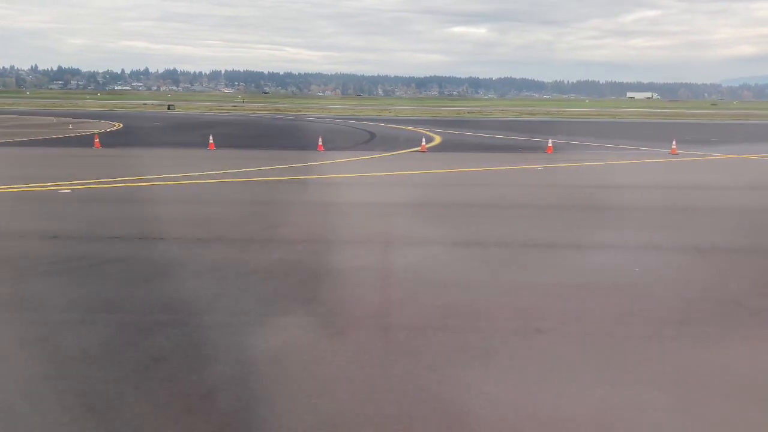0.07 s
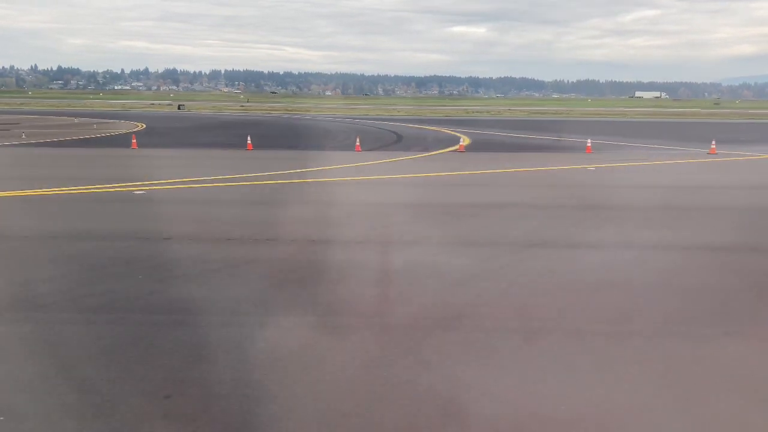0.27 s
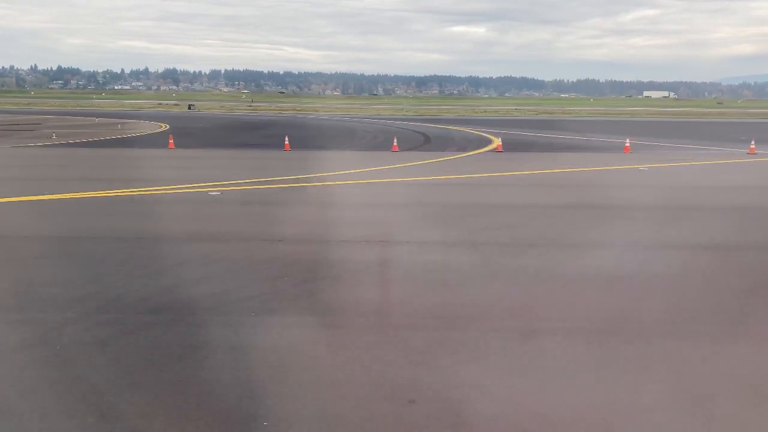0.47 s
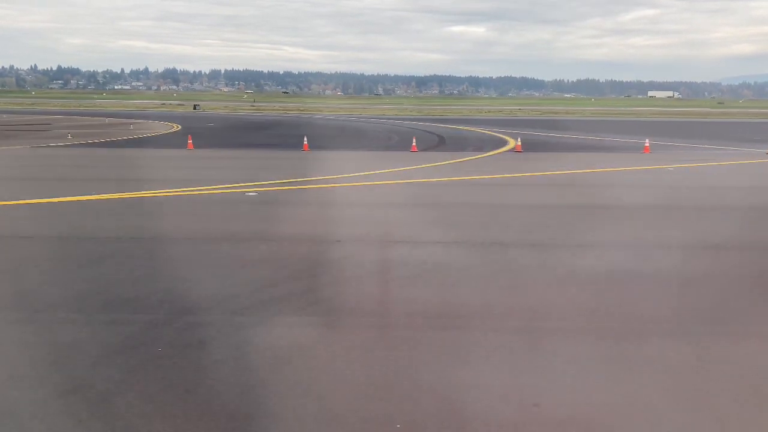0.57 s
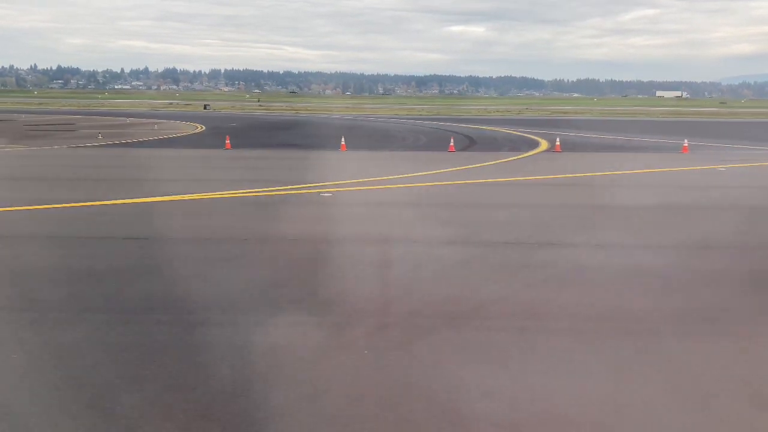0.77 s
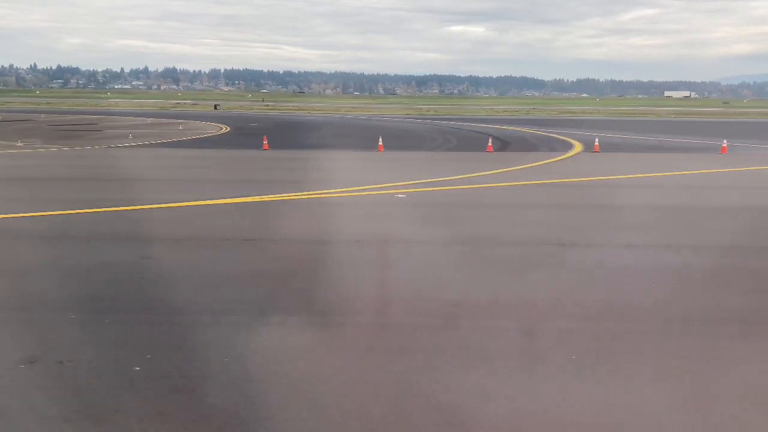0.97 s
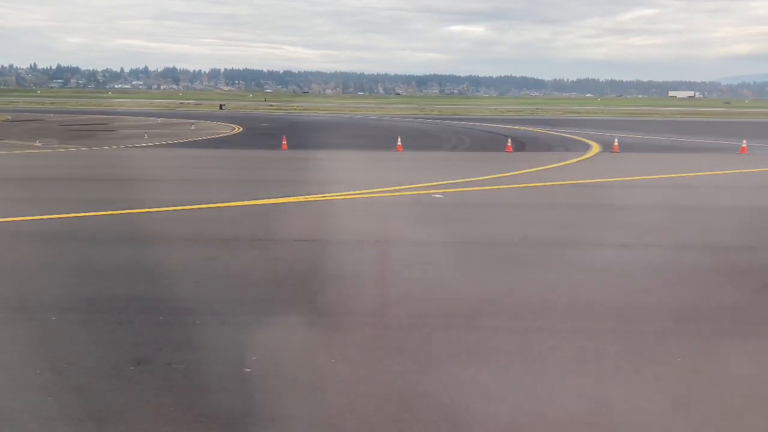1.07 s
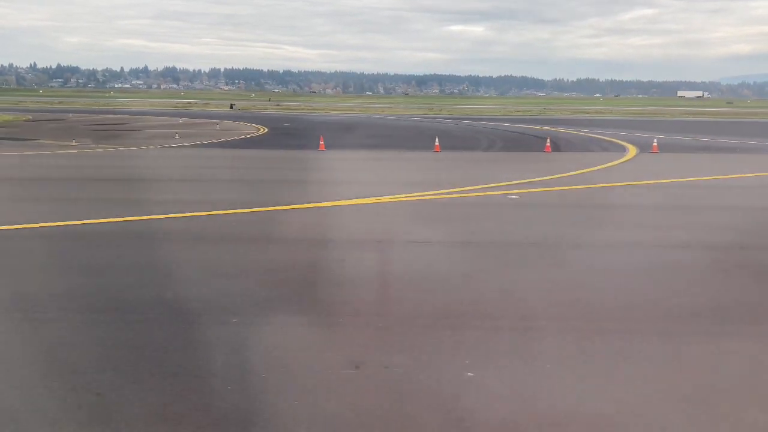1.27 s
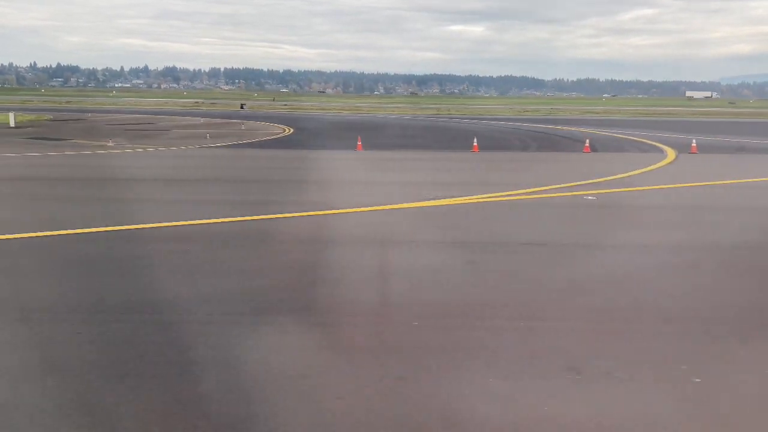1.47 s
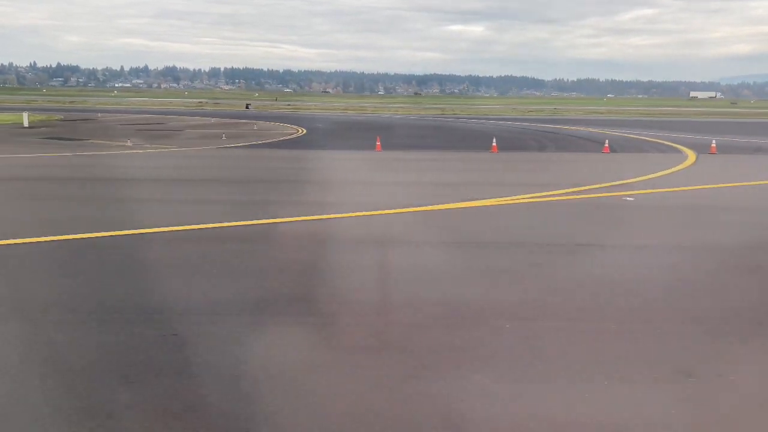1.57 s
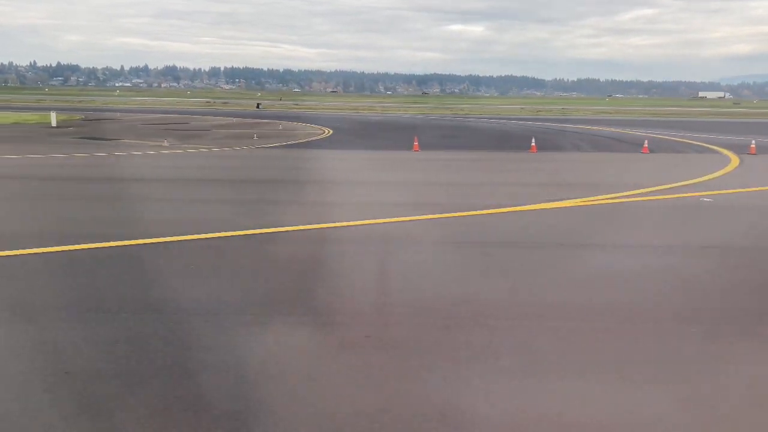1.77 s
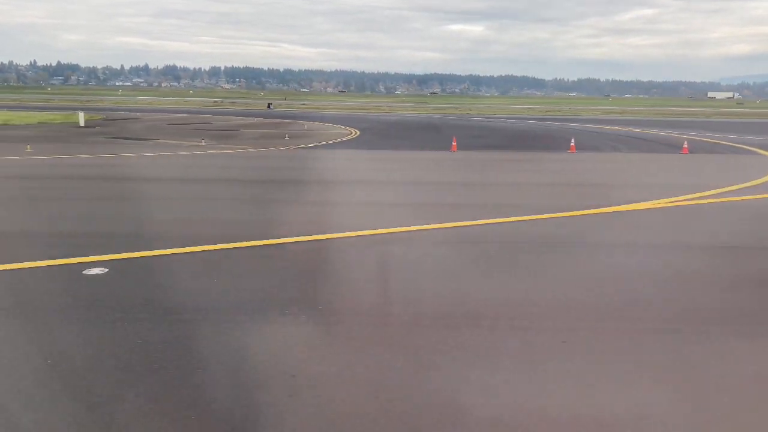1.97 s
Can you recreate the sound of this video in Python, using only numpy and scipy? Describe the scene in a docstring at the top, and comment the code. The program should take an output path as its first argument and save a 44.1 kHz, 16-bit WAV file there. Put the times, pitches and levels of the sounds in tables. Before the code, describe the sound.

Idling aircraft engines drone in a low, throbbing rumble inside the cabin of a taxiing airliner

```python
"""Two seconds inside the cabin of a taxiing airliner, engines at idle; every layer runs throughout.
The engine shafts drone through the fuselage: six low orders, each a wavering tone in a rough noise skirt,
the lowest four throbbing. Under them rolls shaped-noise rumble with booming cabin resonances.
Ventilation air, wide shaped noise with close reflections, rushes all around,
with a few faint turbine whines in it: thin tones that flutter in phase and level."""
import sys
import numpy as np
from scipy import signal
from scipy.fft import rfft, irfft
from scipy.io import wavfile

SR = 44100
rng = np.random.default_rng(int(sys.argv[2]) if len(sys.argv) > 2 else 0)


def bounce(signal):
    """Save signal as a 16-bit WAV file at the path given by the first command-line argument."""
    frames = np.transpose(np.atleast_2d(signal))
    limited = np.clip(frames, -1, 1)
    pcm = np.round(limited * 32767).astype(np.int16)
    wavfile.write(sys.argv[1], SR, pcm)


N = 89346  # samples


def from_db(db):
    """Decibels to amplitude gain."""
    return 10 ** (np.asarray(db) / 20)


def rms_one(x):
    """Scale to unit rms."""
    return x / np.sqrt(np.mean(x ** 2) + 1e-20)


def pan(left_minus_right_db):
    """Left and right gains, splitting a level difference evenly."""
    return from_db(np.array([[left_minus_right_db], [-left_minus_right_db]]) / 2)


def bin_hz():
    """Frequency of each spectrum bin, kept at 1 Hz or more so that its logarithm exists."""
    return np.maximum(np.fft.rfftfreq(N, 1 / SR), 1)


def shaped_noise(gain):
    """Unit-rms noise whose amplitude follows a function of frequency."""
    spectrum = rfft(rng.standard_normal(N))
    return rms_one(irfft(spectrum * gain(bin_hz()), N))


def drift(rate_hz):
    """Slow random wander with a spread of one: noise above 1 Hz that weakens beyond the rate."""
    return shaped_noise(lambda hz: (hz > 1) / (1 + (hz / rate_hz) ** 2))


def wavering(hz, waver_rad, waver_hz, flutter_db):
    """A unit-rms tone that wanders in phase and, independently, in level."""
    cycles = hz * np.arange(N) / SR + rng.random()
    phase = 2 * np.pi * cycles + waver_rad * drift(waver_hz)
    level = from_db(flutter_db * drift(waver_hz))
    return rms_one(np.sin(phase) * level)


def resonant(centre_hz, width_hz):
    """Unit-rms noise passed twice through a resonance."""
    return shaped_noise(lambda hz: 1 / (1 + (2 * (hz - centre_hz) / width_hz) ** 2))


def swell(points):
    """Unit-rms gain that rises and sinks along a centred, slightly flattened level curve."""
    depth = .9  # share of the drawn swell that is followed
    time_s, db = np.transpose(points)
    curve_db = np.interp(np.arange(N) / SR, time_s, db - db.mean())
    return rms_one(from_db(depth * curve_db))


def engine_drone():
    """Each shaft order is a wavering tone in a skirt of resonant noise; the lowest four throb."""
    shaft_hz = 64.18
    # engine orders: (multiple of shaft rate, tone level [dB], skirt level [dB], skirt width [Hz])
    orders = [(1, -23.3, -28, 22), (2, -22, -29, 22), (3, -24, -28, 11), (4, -16.3, -28, 27),
              (5, -26, -26.5, 18), (6, -27.5, -27, 18)]
    # throb of the first order, as drawn before centring and depth: (time [s], level [dB])
    swell_first = [(0.0, 1.9), (0.49, -1.5), (0.57, -7.5), (0.68, 5), (0.86, -4), (0.93, -0.1),
                   (0.99, -3.5), (1.03, -2.3), (1.09, -2), (1.18, 2.5), (1.26, 0), (1.34, -2.5),
                   (1.44, -9.5), (1.58, 1.8), (1.72, -8.5), (1.79, 5.5), (1.9, -0.5), (2.02, -2)]
    # throb of the second order, likewise: (time [s], level [dB])
    swell_second = [(0.0, -3), (0.14, 2.5), (0.19, -2), (0.25, 8), (0.36, -6.5), (0.42, -1), (0.66, -1.5),
                    (0.7, -8.5), (0.91, 0), (1.18, -1.5), (1.29, 4.5), (1.77, -7), (1.89, 6), (2.02, -10.5)]
    # throb of the third order, likewise: (time [s], level [dB])
    swell_third = [(0.03, -23), (0.49, -18), (0.54, -30), (0.71, -20), (1.022, -26), (1.06, -18),
                   (1.27, -30), (1.592, -17), (1.654, -28), (2.0, -25)]
    # throb of the fourth order, likewise: (time [s], level [dB])
    swell_fourth = [(0.0, 0), (0.14, -5.5), (0.21, 4.5), (0.46, -3), (0.54, 3), (0.65, -1.5), (0.73, 4.5),
                    (0.83, -0.9), (0.9, -17.5), (0.95, 4.1), (1.03, 4), (1.08, -4.3), (1.28, 1),
                    (1.34, -2.5), (1.44, -0.4), (1.61, -4), (1.71, 6), (2.02, -4.5)]
    swells = {1: swell_first, 2: swell_second, 3: swell_third, 4: swell_fourth}
    drone = 0
    for multiple, tone_db, skirt_db, width_hz in orders:
        order_hz = multiple * shaft_hz
        tone = wavering(order_hz, waver_rad=.71, waver_hz=2.5, flutter_db=.35)
        skirt = resonant(order_hz, width_hz)
        order = from_db(tone_db) * tone + from_db(skirt_db) * skirt
        if multiple in swells:
            order = order * swell(swells[multiple])
        drone = drone + order
    return drone


def coloured(points):
    """Unit-rms noise with a drawn spectrum, falling away steeply beyond its ends."""
    at_hz, db = np.transpose(points)

    def gain(hz):
        inside = from_db(np.interp(np.log(hz), np.log(at_hz), db))
        low_end = 1 + (at_hz[0] / hz) ** 16
        high_end = 1 + (hz / at_hz[-1]) ** 16
        return inside / np.sqrt(low_end * high_end)

    return shaped_noise(gain)


def cabin_rumble():
    """Broad noise rumble of engines and wheels, with the cabin's booming resonances as noise bands."""
    rumble_db = -20
    # spectrum shape of the rumble: (frequency [Hz], relative density [dB per Hz])
    rumble_spectrum = [(29, -28.5), (34, -17), (44, -6), (100, -1), (165, -1.5), (230, -1), (300, -1.5),
                       (400, -4.5), (470, -5), (540, -14), (650, -8), (800, -14.5), (950, -22),
                       (1200, -42.5)]
    # cabin resonances: (centre [Hz], width [Hz], level [dB])
    boom_bands = [(72.7, 13, -25), (364, 14, -26), (433.2, 24, -27.5), (633, 44, -42.5)]
    booms = sum(from_db(db) * resonant(hz, width_hz) for hz, width_hz, db in boom_bands)
    return from_db(rumble_db) * coloured(rumble_spectrum) + booms


def reflected(x, count=14):
    """Close reflections from wall and seats give steady noise a fine, fixed colouring."""
    echo_db, latest_s = -21.5, .03  # level of each reflection, latest arrival
    lags = rng.uniform(latest_s / 10, latest_s, count) * SR
    signs = rng.choice([-1, 1], count)
    echoes = sum(sign * np.roll(x, int(lag)) for lag, sign in zip(lags, signs))
    return rms_one(x + from_db(echo_db) * echoes)


def air_rush():
    """Wide rush of ventilation and jet air: noise shared by both ears plus noise opposed between them."""
    mid_db, side_db = -43, -27
    # spectrum shape of the shared part: (frequency [Hz], relative density [dB per Hz])
    mid_spectrum = [(950, -4.5), (1130, -9), (1300, -2.5), (1420, -8.5), (1550, -5.5), (1900, -11),
                    (2200, -10.5), (2900, -14), (3400, -19.5), (3800, -25), (4200, -24.5), (5000, -29),
                    (6500, -29), (7700, -34.5), (8600, -43), (10000, -30), (11000, -35), (12300, -45),
                    (14000, -29.5), (15000, -38)]
    # spectrum shape of the opposed part: (frequency [Hz], relative density [dB per Hz])
    side_spectrum = [(40, -22), (60, -9), (150, -10), (300, -5), (430, -1.5), (520, -4.5), (680, -6.5),
                     (800, -8), (900, -11), (1100, -15), (1400, -20.5), (1650, -28.5), (2200, -32),
                     (2800, -32), (3400, -34), (4000, -44.5), (5000, -45), (7000, -49.5), (8600, -51.5),
                     (10000, -56.5), (12200, -51.5), (14000, -52)]
    mid = from_db(mid_db) * reflected(coloured(mid_spectrum))
    side = from_db(side_db) * reflected(coloured(side_spectrum))
    return np.array([mid + side, mid - side])


def turbine_whines():
    """Thin fluttering tones, partly direct and partly diffuse, wavering separately at each ear."""
    spread = .43  # diffuse share of the power
    # turbine whines: (frequency [Hz], level [dB], left minus right [dB])
    whine_tones = [(1311, -57.5, 2.5), (2252, -64.5, 0), (4110, -72, -2), (4122, -68.5, 1.5),
                   (14260, -80.5, -3)]
    whines = 0
    for hz, db, pan_db in whine_tones:
        direct, *diffuse = [wavering(hz, waver_rad=.6, waver_hz=16, flutter_db=2.0) for _ in range(3)]
        both_ears = np.sqrt(1 - spread) * direct + np.sqrt(spread) * np.array(diffuse)
        whines = whines + from_db(db) * pan(pan_db) * both_ears
    return whines


def seat_balance(ears):
    """Beside the window, pitch ranges lean slightly to one side or the other."""
    # level balance of the ears: (frequency [Hz], left minus right [dB])
    balance = [(60, -1.0), (110, -1.1), (230, 1.5), (380, -0.5), (570, 2.5), (900, 1), (1400, 0),
               (2200, -0.5), (4000, 1.5), (10000, 0)]
    at_hz, db = np.transpose(balance)
    lean_db = np.interp(np.log(bin_hz()), np.log(at_hz), db)
    return irfft(rfft(ears) * from_db(np.array([lean_db, -lean_db]) / 2), N)


def scene():
    """The low sound reaches the left ear a little earlier; air and whines surround it."""
    right_lag_s = .00004
    t = np.arange(N) / SR
    low = engine_drone() + cabin_rumble()
    low_ears = np.array([low, np.interp(t - right_lag_s, t, low)])
    return seat_balance(low_ears + air_rush()) + turbine_whines()


def record(dry):
    """The highest peaks are rounded and a steep low-pass cuts the top."""
    cutoff_hz = 15100
    rounded = dry / (1 + np.abs(dry) ** 8) ** (1 / 8)
    # order 10, 0.2 dB ripple in the passband, 70 dB rejection above it
    low_pass = signal.ellip(10, .2, 70, cutoff_hz, fs=SR, output="sos")
    return signal.sosfilt(low_pass, rounded)


dry = scene()
out = record(dry)
bounce(out)
```